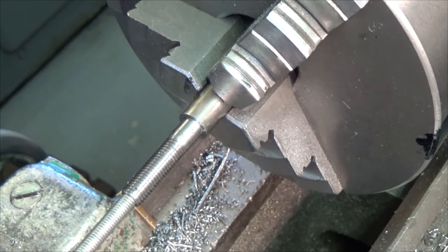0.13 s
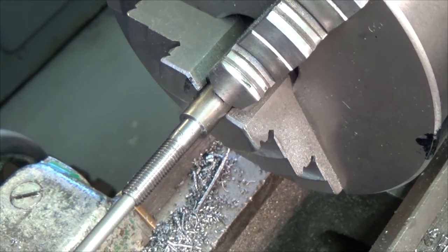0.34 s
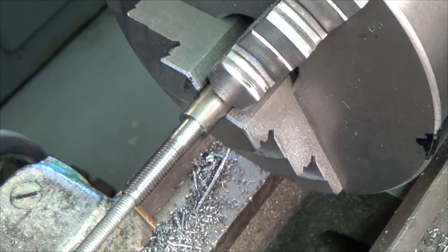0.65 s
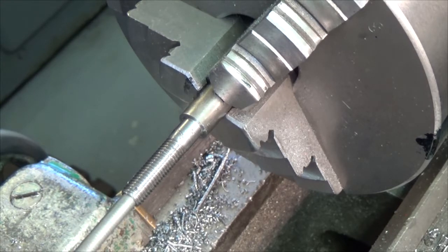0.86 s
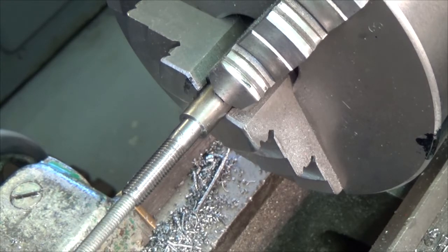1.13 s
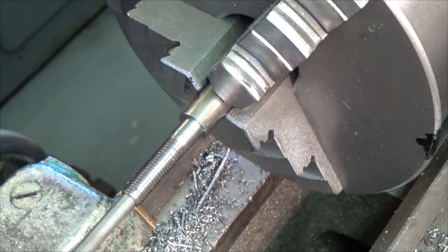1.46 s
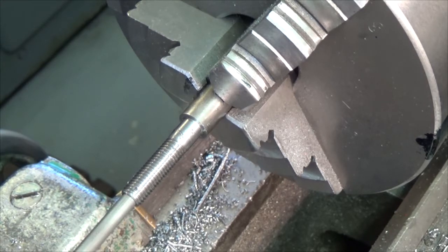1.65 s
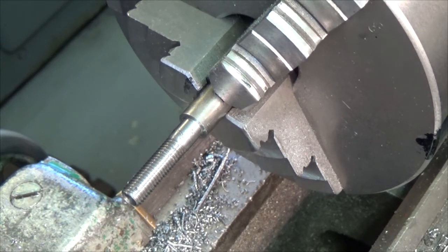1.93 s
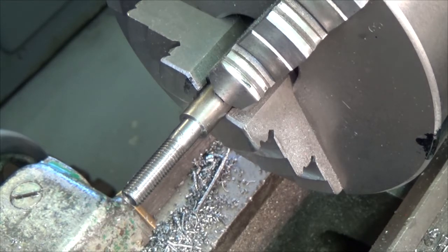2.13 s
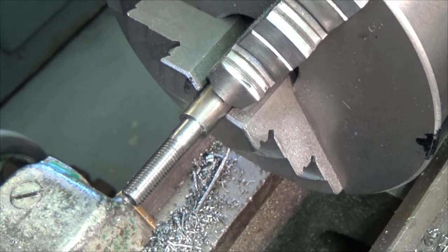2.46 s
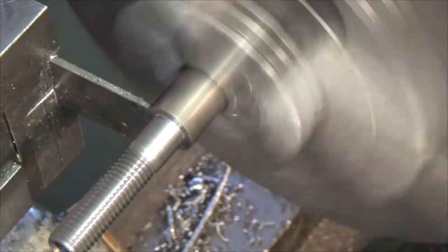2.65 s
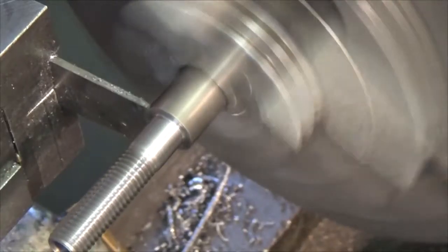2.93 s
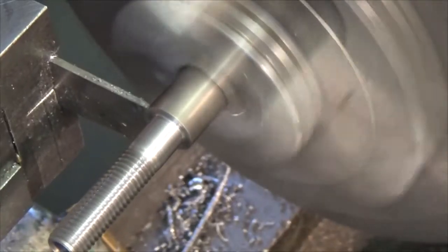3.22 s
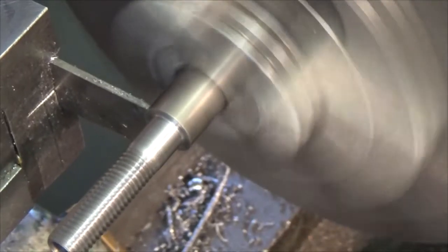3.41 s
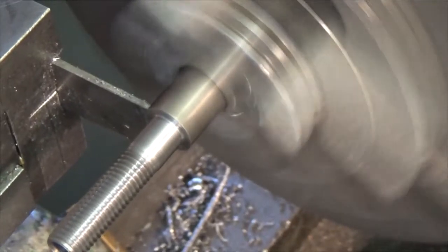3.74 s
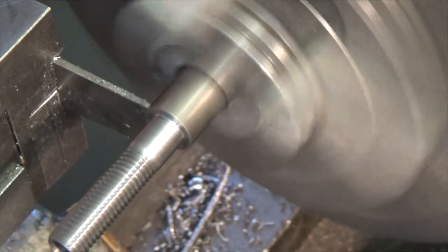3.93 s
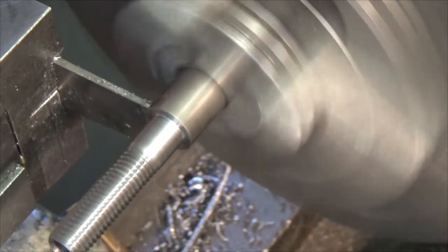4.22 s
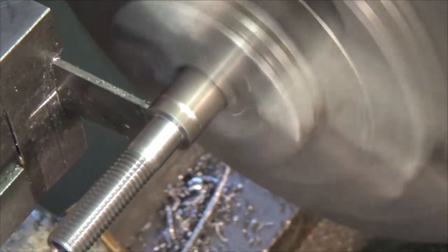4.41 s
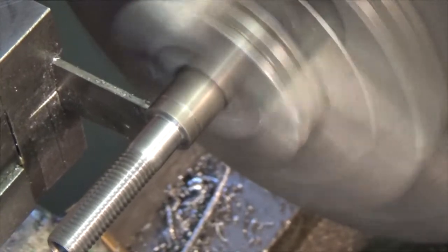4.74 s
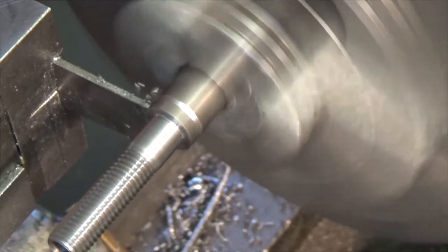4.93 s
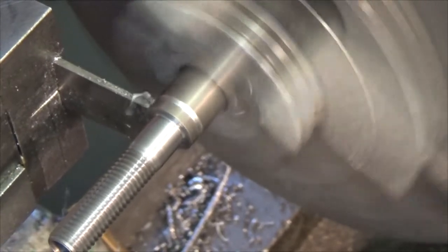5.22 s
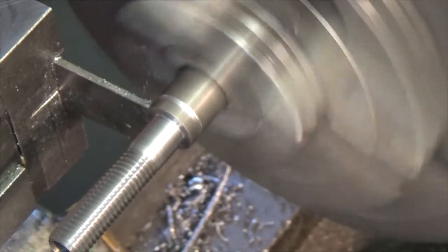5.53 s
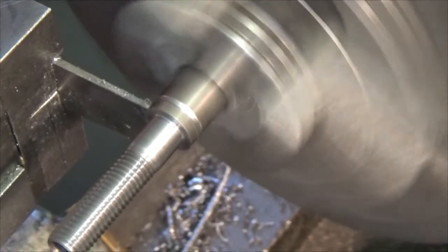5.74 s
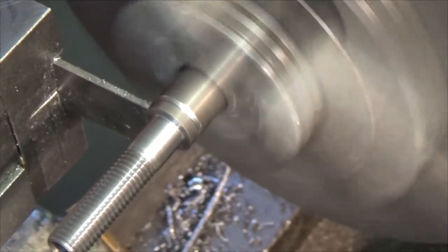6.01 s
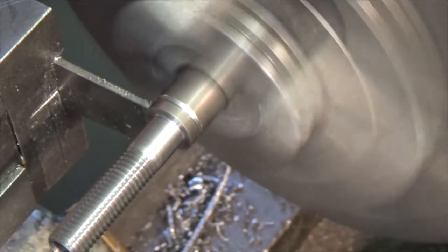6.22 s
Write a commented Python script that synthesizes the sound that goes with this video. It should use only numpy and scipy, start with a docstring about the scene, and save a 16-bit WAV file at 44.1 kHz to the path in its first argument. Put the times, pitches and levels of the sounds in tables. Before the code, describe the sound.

In a quiet, faintly humming workshop, a metal part is rubbed in short gritty strokes with bright clicks, ringing taps and dull bench knocks. After a brief lull, a close lathe cuts in abruptly with rattling gear drone and chirping belt. A blade touches the turning metal, crackling and shrieking extremely high in bursts, then continuously, pushing the drone down.

```python
"""In a quiet workshop with mains hum, a metal part is rubbed and tapped: grit excites its modes and a knocked bench.
At 2.57 s this gives way at once to a lathe close by: gear noise rings a housing and a slipping belt squeaks.
A parting blade touches the spinning part, crackles with chips and squeals near 12 kHz, a chatter mode whose
pitch swings with each turn; it is so loud that the gain control of the recorder pushes the drone down."""
import sys
import numpy as np
from scipy import signal
from scipy.fft import rfft, irfft
from scipy.io import wavfile
from scipy.ndimage import uniform_filter1d, minimum_filter1d

SR = 44100
rng = np.random.default_rng(int(sys.argv[2]) if len(sys.argv) > 2 else 0)


def unload_audio(sound):
    """Save the sound as a 16-bit wav file, at the path given as the first command line argument."""
    columns = np.transpose(np.atleast_2d(sound))
    # keep every value between -1 and 1, then stretch to whole-number steps
    steps = np.round(np.clip(columns, -1, 1) * 32767)
    wavfile.write(sys.argv[1], SR, steps.astype(np.int16))


def convert_level_to_amplitude(level_db):
    """Map a level in decibels to its linear amplitude factor."""
    exponent = np.asarray(level_db, float) / 20
    return 10 ** exponent


N = 280917
T = np.arange(N) / SR  # time [s]
LATHE_S = 2.568  # the bench stops and the lathe is heard

# how hard the blade sings, one curve a touch: (time [s], relative level [dB])
TOUCHES = [
    [(4.045, -40), (4.056, 12.5), (4.085, 12.5), (4.115, 9.5), (4.135, -9), (4.16, -13.5), (4.213, -29),
     (4.222, 18), (4.245, 9), (4.265, -2), (4.388, -37), (4.396, -15)],
    [(4.843, -15), (4.856, 9.5), (4.915, 12), (4.94, -1.5), (4.97, -15.5), (4.985, 12.5), (5.08, 10.5),
     (5.095, -12), (5.108, 13), (5.14, 13), (5.185, 14), (5.2, -3), (5.218, 14), (5.275, 4), (5.3, -12),
     (5.335, -32.5)],
    [(5.362, -17), (5.385, 13), (5.41, 15.5), (5.6, 21), (5.9, 17), (6.32, 22), (6.345, 12), (6.37, -16)],
]


def evened(x):
    """Normalisation: scales a signal to rms 1."""
    return x / np.sqrt(np.mean(x ** 2) + 1e-20)


def colour(x, points):
    """Linear filtering: shapes the spectrum by (frequency [Hz], gain [dB]) points on a log-frequency axis."""
    hz, db = np.transpose(points)
    f = np.fft.rfftfreq(x.shape[-1], 1 / SR)
    gain = convert_level_to_amplitude(np.interp(np.log(f + 1), np.log(hz + 1), db))
    return irfft(rfft(x) * gain, x.shape[-1])


def through(x, peaks, between):
    """Resonance: bell-shaped (frequency [Hz], width [Hz], gain [dB]) peaks add to a flat gain."""
    f = np.fft.rfftfreq(N, 1 / SR)
    lift = sum(convert_level_to_amplitude(db) / (1 + (2 * (f - hz) / width) ** 2) for hz, width, db in peaks)
    return irfft(rfft(x) * (between + lift), N)


def along(tables, column, rest=None):
    """Interpolation: a column of joined tables against time; rest is the value outside them."""
    rows = np.concatenate(tables)
    out = np.interp(T, rows[:, 0], rows[:, column])
    if rest is None:
        return out
    inside = sum((T >= r[0][0]) & (T <= r[-1][0]) for r in tables) > 0
    return np.where(inside, out, rest)


def round_trip(table, period_s, origin_s, column):
    """Periodicity: reads a table that repeats with every turn."""
    rows = np.array(table)
    return np.interp((T - origin_s) / period_s, rows[:, 0], rows[:, column], period=1)


def swells(rows):
    """Envelopes: level [dB] of the loudest row (start, peak, end, dB), its index and its depth below peak."""
    t = np.arange(0, N, 16) / SR  # one value for 16 samples
    start, peak, end, db = np.transpose(rows)[:4, :, None]
    # 34 dB below the peak at the start, 29 dB at the end; exponents over 1 round the top
    rise = 34 * np.clip((peak - t) / np.maximum(peak - start, .004), 0, 9) ** 1.55
    fall = 29 * np.clip((t - peak) / np.maximum(end - peak, .004), 0, 9) ** 1.3
    below = np.minimum(rise + fall, 90)
    loudest = (db - below).argmax(0)
    level = np.maximum((db - below).max(0), -90)
    depth = below[loudest, np.arange(len(t))]
    return [np.repeat(v, 16)[:N] for v in (level, loudest, depth)]


def wander(hz):
    """Random modulation: low-passed noise of rms 1, with fluctuations up to about hz."""
    low_pass = signal.butter(4, hz, fs=SR, output="sos")
    return evened(signal.sosfilt(low_pass, rng.standard_normal(N)))


def grit(per_s, spread_db, smooth):
    """Stick-slip friction: dense slips of uneven size over a share of smooth noise."""
    size = convert_level_to_amplitude(spread_db * np.minimum(rng.exponential(1, N), 2))
    slips = (rng.random(N) < per_s / SR) * size * rng.choice([-1., 1.], N)
    return evened(evened(slips) + smooth * rng.standard_normal(N))


def tone(hz, fuzz_hz, fuzz):
    """Phase integration: a complex whistle along hz, partly steady, partly narrow-band noise."""
    blur = wander(fuzz_hz) + 1j * wander(fuzz_hz)
    share = np.clip(fuzz, 0, 1)
    return (np.sqrt(2 * (1 - share)) + np.sqrt(share) * blur) * np.exp(2j * np.pi * np.cumsum(hz) / SR)


def spread(x, wide_db):
    """Decorrelation: two close microphones share a sound and get opposite signs of its early tail."""
    tail = rng.standard_normal(5000) * np.exp(-np.arange(5000) / 1100)
    side = convert_level_to_amplitude(wide_db) * signal.oaconvolve(x, tail / np.linalg.norm(tail))[:N]
    return np.array([x + side, x - side])


def workshop():
    """Background noise: shaped room noise and wavering mains hum."""
    # room noise colour: (frequency [Hz], gain [dB])
    room = [(15, -35), (25, -15), (55, -14), (111, -7), (200, -5.5), (335, -8.5), (394, -12), (624, -17),
            (796, -15.5), (3430, -27), (16000, -25.5)]
    # mains hum: (frequency [Hz], relative level [dB])
    hum = [(48.4, -62.5), (150.7, -65), (199.2, -61.5), (398.4, -67.5)]
    noise = convert_level_to_amplitude(-54.5) * evened(colour(rng.standard_normal(N), room)) * convert_level_to_amplitude(wander(25))
    return noise + sum(convert_level_to_amplitude(db) * tone(np.full(N, hz), 5.0, 0.41).real for hz, db in hum)


def rubbing_and_taps():
    """Friction and impact: gritty strokes and short noise bursts give a bright rasp and a duller body."""
    # strokes of metal on metal:
    # (start [s], peak [s], end [s], relative level [dB], relative level of low body over rasp [dB])
    strokes = [(0.022, .032, 0.051, -52.5, -8), (0.102, .12, 0.23, -55.5, 7),
               (0.18, 0.236, 0.28, -40.5, -12), (0.241, 0.371, 0.4, -30, -6.5),
               (0.507, .554, .62, -30.5, -9), (0.59, 0.622, .65, -23.5, -11.5),
               (0.744, 0.805, .86, -25.5, -11.5), (0.853, 0.876, 0.93, -39, -5.5),
               (0.912, 0.923, 0.94, -21, -12.5), (0.947, 0.95, 1, -25.5, -12),
               (1.015, 1.038, 1.08, -40, -4.5), (1.085, 1.097, 1.16, -35, -8.5),
               (1.212, 1.239, 1.353, -39.5, -4.5), (1.31, 1.328, 1.378, -26, -10.5),
               (1.442, 1.469, 1.496, -26, -9.5), (1.519, 1.544, 1.58, -19.5, -12.5),
               (1.653, 1.733, 1.75, -23, -16.5), (1.68, 1.8, 1.85, -25.5, -9.5),
               (2.27, 2.295, 2.333, -58, -4)]
    # loudest taps: (time [s], relative level [dB])
    taps = [(0.0976, -32), (0.1199, -22.5), (0.1662, -24), (0.2872, -22.5), (0.3416, -13.5),
            (0.3582, -14.5), (0.519, -24), (0.5541, -18), (0.618, -13), (0.7561, -16.5), (0.7822, -12.5),
            (0.88, -23), (0.9158, -13), (0.9227, -9), (0.949, -15), (1.0939, -22), (1.2101, -30),
            (1.233, -30), (1.3167, -12.5), (1.3463, -11.5), (1.4505, -15.5), (1.527, -14), (1.5372, -10),
            (1.711, -8), (1.7913, -11), (1.8219, -1.5)]
    # colours of rasp and body: (frequency [Hz], gain [dB])
    rasp_colour = [(1880, -37), (3200, -23.5), (4450, -9), (5060, -12), (5790, -9), (7730, 1), (8850, -5.5),
                   (10300, 4), (11800, -5), (12900, 1.5), (13800, -22), (15200, -5), (16000, -5.5)]
    body_colour = [(120, -50), (200, -10.5), (394, -8.5), (473, -8), (755, 4), (860, -3.5), (2470, -6),
                   (2970, -4), (4500, -26), (5850, -36), (9900, -120)]
    level_db, which, below_db = swells(strokes)
    press_db = level_db + 1.8 * wander(101)
    # softer contact is duller: the body gains 0.59 dB on the rasp for each dB below the peak
    weight_db = np.transpose(strokes)[4][which] + 0.59 * np.minimum(below_db, 30)
    u = np.arange(600) / SR
    # small catches along a stroke, 70 a second on average, each a burst with a T60 of 11 ms
    catches = (rng.random(N) < 70 / SR) * convert_level_to_amplitude(-6.5 + 3.0 * rng.standard_normal(N))
    burst = evened(rng.standard_normal(600) * convert_level_to_amplitude(-60 * u / 0.011))
    rough = grit(7000, 1.6, 2.2) + signal.oaconvolve(catches, burst)[:N]
    rasp = evened(colour(rough, rasp_colour)) * convert_level_to_amplitude(press_db)
    body = evened(colour(rough, body_colour)) * convert_level_to_amplitude(press_db + weight_db - 3.5)
    puffs = rng.standard_normal((len(taps), 600)) * convert_level_to_amplitude(-60 * u / 0.014)
    for (s, db), puff in zip(taps, puffs):
        at = round(s * SR)
        rasp[at:at + 600] += convert_level_to_amplitude(db - 18) * evened(colour(puff, rasp_colour))
        body[at:at + 600] += convert_level_to_amplitude(db - 39) * evened(colour(puff, body_colour))
    return rasp, body


def ringing(rasp, body):
    """Modal resonance: the body drives the low modes of part and holder, the rasp the high ones."""
    # modes: (frequency [Hz], relative level [dB], T60 [s])
    part_modes = [(400, -9, .2), (610, -8, .06), (745, -11, .04), (1720, -6, .045), (2470, -3, .04),
                  (2535, 2.5, .055), (4090, -14, .13), (5524, -21, .5), (5541, -18, .4), (10200, -7, .04),
                  (13300, -27, .4)]
    t = np.arange(SR // 2) / SR
    modes = np.array([convert_level_to_amplitude(db - 60 * t / t60) * np.sin(2 * np.pi * hz * t) for hz, db, t60 in part_modes])
    high = np.transpose(part_modes)[0] > 3000
    # the contact point roams, so each low mode is driven unevenly
    low_ring = sum(signal.oaconvolve(body * convert_level_to_amplitude(2.7 * wander(4.9)), m)[:N] for m in modes[~high])
    grip_db = np.where(T < 1.67, -2, 3.5)  # the hand damps the high modes, then lets go
    high_ring = signal.oaconvolve(rasp * convert_level_to_amplitude(grip_db), modes[high].sum(0))[:N]
    return convert_level_to_amplitude(-33.5) * low_ring + convert_level_to_amplitude(-30) * high_ring


def knocks():
    """Impact response: the holder knocks on the bench, which booms as decaying sines."""
    # knocks: (time [s], frequency [Hz], level before the envelope [dB])
    bench_knocks = [(.95, 401, -41), (1.0, 400, -42), (1.35, 400, -37.5), (1.385, 400, -44),
                    (1.78, 268.4, -37.5), (1.82, 272.2, -40.5)]
    rise_s, t60_s = .008, .25
    t = np.arange(SR // 2) / SR
    boom = np.zeros(N + len(t))
    for s, hz, db in bench_knocks:
        envelope = convert_level_to_amplitude(db - 60 * t / t60_s) * np.minimum(t / rise_s, 1)
        boom[round(s * SR):][:len(t)] += envelope * np.sin(2 * np.pi * hz * t)
    return boom[:N]


def drag():
    """Cavity resonance: the last strokes drag over two hollows, each a narrow-band tone."""
    # (start [s], peak [s], end [s], relative level [dB], resonance [Hz])
    hollows = [(1.703, 1.72, 1.785, -32.5, 1360), (1.72, 1.781, 1.884, -39, 2197)]
    return sum(convert_level_to_amplitude(swells([row])[0]) * tone(np.full(N, row[4]), 330, 0.73).real for row in hollows)


def walls(direct):
    """Reverberation: the walls answer with a duller noise tail that decays exponentially."""
    t = np.arange(SR // 2) / SR
    tail = rng.standard_normal(len(t)) * convert_level_to_amplitude(-60 * t / 0.42)
    tail = colour(tail, [(100, 13.5), (2000, -3.5), (8000, -13), (16000, -28.5)])
    return convert_level_to_amplitude(-12) * signal.oaconvolve(direct, tail / np.linalg.norm(tail))[:N]


def handling():
    """Superposition: friction, hollows, bench and modes sum, and the walls reflect the sum."""
    rasp, body = rubbing_and_taps()
    body = body + drag()
    direct = rasp + body + knocks() + ringing(rasp, body)
    return direct + walls(direct)


def drone():
    """Forced vibration: gear noise rings the housing, hardest at the first jolt; the motor hums below."""
    # gear noise colour: (frequency [Hz], gain [dB])
    gear_colour = [(18, -57), (30, -25), (98, -9.5), (189, -12.5), (384, -5.5), (1150, -5.5), (1460, -4.5),
                   (1800, -5.5), (2400, -9), (3300, -11.5), (4200, -12), (4900, -15.5), (5600, -12),
                   (6300, -10.5), (7600, -18.5), (10500, -17.5), (16000, -35.5)]
    # housing resonances: (frequency [Hz], width [Hz], gain [dB])
    housing = [(379, 11.6, 6), (511, 4.3, 2.5), (550, 21, -4), (610.8, 4.5, 2), (690, 3.1, -2), (727, 6, 6),
               (767, 30, -3.5), (899.6, 10, -2.5), (1411, 26, 0), (1463, 19, -5), (1544, 34, -6.5),
               (1740, 2.7, -10.5), (1880, 14, -1.5), (2083, 18, 2), (2280, 6.3, -1), (2550, 20, 1.5)]
    # motor hum: (frequency [Hz], level relative to the gears [dB])
    motor = [(99, -22), (118, -23)]
    rattle = colour(grit(6000, 2.1, 1.51), gear_colour)
    since = np.maximum(T - LATHE_S, 0)
    thud = evened(colour(rattle, [(250, -24), (430, 13), (620, -15), (850, 5.5), (1600, -10), (4000, -66)]))
    jolt = convert_level_to_amplitude(6.5 - 60 * since / 0.24) * thud * rattle.std()
    gears = evened(through(rattle + jolt * (since > 0), housing, 0.42)) * convert_level_to_amplitude(0.84 * wander(36))
    return gears + sum(convert_level_to_amplitude(db) * tone(np.full(N, hz), 3.6, 0.27).real for hz, db in motor)


def belt():
    """Stick-slip: a falling first slide, then squeak and hiss that vary with each lap, through guard resonances."""
    # first slide: (time [s], frequency of the fundamental [Hz], relative level [dB])
    settle = [(2.57, 4660, -4.5), (2.64, 4630, 3), (2.68, 4110, 1), (2.72, 3716, -6.5), (2.76, 3300, -8),
              (2.79, 3220, -38)]
    # one lap: (share of the lap [1], mean frequency of the fundamental [Hz], relative level [dB])
    lap = [(0, 3125, 1.5), (.07, 3203, -13.5), (.14, 3333, 2), (.22, 3500, -10), (.36, 3194, -19),
           (.5, 3212, -2.5), (.7, 2900, -16), (.82, 2639, -2.5), (.9, 2723, -2.5)]
    # belt guard: (frequency [Hz], width [Hz], gain [dB])
    guard = [(2510, 300, -2.5), (2900, 66, 1.5), (3214, 76, 7), (3500, 130, 5.5), (3840, 350, 4),
             (5390, 200, -0.5), (5890, 25, 10.5), (6407, 97, 7.5), (7985, 86, 8.5), (9120, 100, 7.5),
             (10150, 150, 5)]
    lap_s, lap_origin_s = .1125, 2.8
    slide_hz = along([settle], 1)
    slide = sum(convert_level_to_amplitude(db + 3.1 * wander(39.9)) * tone(k * slide_hz, 260 * k ** 2.55, 1).real
                for k, db in zip((1, 2, 3), (-4, -9, -14)))
    squeak_hz = round_trip(lap, lap_s, lap_origin_s, 1) * (1 + .012 * wander(15))
    squeak = sum(convert_level_to_amplitude(db + 2.55 * wander(62)) * tone(k * squeak_hz, 210 * k, 0.87).real
                 for k, db in zip((1, 2, 3, 4), (-7, -7.5, -13, -19)))
    hiss_colour = [(1500, -30), (3000, -6), (10000, -17.0), (16000, 2)]
    hiss = convert_level_to_amplitude(-11) * evened(colour(rng.standard_normal(N), hiss_colour))
    first = (slide + hiss) * convert_level_to_amplitude(along([settle], 2))
    running = (squeak + hiss) * convert_level_to_amplitude(round_trip(lap, lap_s, lap_origin_s, 2))
    return through(np.where(T < settle[-1][0], first, running), guard, 0.61)


def dull_floor():
    """Noise floor: steady low-frequency noise from the moment the lathe is heard."""
    # floor colour: (frequency [Hz], gain [dB])
    under = [(18, -47), (30, -6), (368, 1), (579, -12.5), (1500, -12.5), (3230, -20), (3720, -20),
             (9000, -26), (11700, -58), (19800, -120)]
    noise = convert_level_to_amplitude(-50.0) * evened(colour(rng.standard_normal(N), under))
    return spread(noise, -18.0) * (T >= LATHE_S)


def chips():
    """Fracture noise: the chip crackles as it curls during a touch and bursts as it snaps."""
    # snaps: (start [s], peak [s], end [s], relative level [dB]); an end before the peak gives a 4 ms fall
    snaps = [(3.78, 3.82, 3.85, -15), (3.9, 3.966, 3.99, -24), (4.02, 4.046, 4.06, -15.5),
             (4.2, 4.384, 4.42, -31), (4.43, 4.454, 4.6, -24.5), (4.79, 4.847, 5.15, -16),
             (4.88, 4.95, 5.05, -16), (5.07, 5.098, 5.13, -8), (5.14, 5.205, 5.3, -14),
             (5.25, 5.35, 5.5, -27), (5.46, 5.49, 4.4, -7), (5.75, 5.774, 5.8, -10), (6.27, 6.314, 7.8, -9)]
    # crackle colour: (frequency [Hz], gain [dB])
    chip_colour = [(6000, -18.5), (8500, -18), (10200, 10.5), (11500, 4.5), (12800, 2), (13600, -21),
                   (16000, -45)]
    touching = np.isfinite(along(TOUCHES, 1, rest=np.nan))
    level = uniform_filter1d(convert_level_to_amplitude(-24.5) * touching + convert_level_to_amplitude(swells(snaps)[0]), 100)
    level = level * convert_level_to_amplitude(3.3 * wander(75))
    return level * evened(colour(grit(5000, 2.7, 0.2), chip_colour))


def squeal():
    """Self-excited vibration: the blade chatters on one mode and run-out bends its pitch each turn."""
    # the cut: (time [s], mean pitch [Hz], run-out as a multiple of the turn's swing [1])
    cut = [(4.05, 11800, 0.25), (4.15, 11600, .2), (4.24, 11870, 0.16), (4.39, 11990, 0.18),
           (4.85, 11700, 0.16), (4.97, 11610, 0.14), (5.055, 12020, 0.17), (5.088, 11700, .2),
           (5.13, 11770, .5), (5.3, 11660, 0.37), (5.45, 11880, 1.1), (5.6, 12030, 1.6), (5.9, 12160, 1.2),
           (6.27, 12200, 1.26), (6.37, 11550, 0.92)]
    # one spindle turn: (share of the turn [1], pitch swing at run-out 1 [Hz], level swing at run-out 1 [dB])
    spindle_turn = [(0, 366.5, -4), (.1, -4, 3), (.22, -290, 4), (.31, -200, -1), (.4, 160.5, 2.5),
                    (.55, 80, -0.5), (.75, -150, -3.5), (.83, -140, 1.5), (.94, 250.5, -4.5)]
    turn_s, turn_origin_s = .1344, 5.605
    run_out = along([cut], 2)
    hz = along([cut], 1) + run_out * round_trip(spindle_turn, turn_s, turn_origin_s, 1) + 35 * wander(61.4)
    db = along(TOUCHES, 1, rest=-93) + run_out * round_trip(spindle_turn, turn_s, turn_origin_s, 2)
    core = tone(hz, 67, 0.34).real
    near_skirt = convert_level_to_amplitude(-8) * tone(hz, 247, 0.97).real
    wide_skirt = convert_level_to_amplitude(-27 + 4.0 * wander(24)) * tone(hz - 250, 850, 0.92).real
    return convert_level_to_amplitude(uniform_filter1d(db, 40)) * (core + near_skirt + wide_skirt)


def scene():
    """Superposition: the quiet bench first, then the running lathe with its blade."""
    # the lathe sits to the right: (frequency [Hz], left minus right [dB])
    lean = [(60, -2), (150, -1), (380, -3), (950, -3), (2380, -3.5), (5980, 0), (15000, -5.5)]
    since = T - LATHE_S
    bench = spread(workshop() + handling(), -26.0) * (since < 0)
    # the machine starts 6.5 dB softer and swells to its level in 85 ms
    machine_db = -20.5 - 6.5 * np.clip(1 - since / 0.085, 0, 1)
    machine = spread((drone() + belt()) * convert_level_to_amplitude(machine_db), -20.0)
    machine = np.array([colour(m, [(hz, side * db / 2) for hz, db in lean])
                        for m, side in zip(machine, (1, -1))])
    blade = spread(squeal() + chips(), -25.0) * convert_level_to_amplitude([[.25], [-.25]])
    return bench + (machine + blade) * (since >= 0)


def gain_control(dry):
    """Dynamic compression: a quick control acts on the held level, a slow one builds up with it and fades."""
    knee_db, squeeze, memory, memory_s = -16, 0.87, 1.555, 0.76
    ease, hold = round(0.014 * SR), round(0.0099 * SR)  # smoothing and hold [samples]
    power_db = 10 * np.log10(abs(uniform_filter1d((dry ** 2).mean(0), ease)) + 1e-12)
    held_db = -minimum_filter1d(-power_db, hold, origin=(hold - 1) // 2)
    quick_db = uniform_filter1d(squeeze * np.maximum(held_db - knee_db, 0), ease)
    keep = np.exp(-1 / (memory_s * SR))
    slow_db = memory * signal.lfilter([1 - keep], [1, -keep], quick_db)
    return dry / convert_level_to_amplitude(np.maximum(quick_db, slow_db))


def limiter(x):
    """Peak limiting: a 2 ms peak envelope over 0.49 divides the signal."""
    peak = -minimum_filter1d(-abs(x).max(0), 88)
    return x / uniform_filter1d(np.maximum(peak / 0.49, 1), 88)


def band_limit(x):
    """Low-pass filtering: a linear-phase filter removes what lies above about 15.75 kHz."""
    taper = signal.firwin(511, 15750, window=("kaiser", 9), fs=SR)
    return signal.oaconvolve(x, taper[None], "same")


def roll_off(x):
    """The treble ends steeply here."""
    return signal.sosfilt(signal.butter(12, 16630, fs=SR, output="sos"), x)


def record(dry):
    """Level regulation: gain control, a dull floor that it leaves alone, a limiter and a band limit."""
    even = gain_control(dry) + dull_floor()
    return roll_off(band_limit(limiter(even)))


dry = scene()
out = record(dry)
unload_audio(out)
```